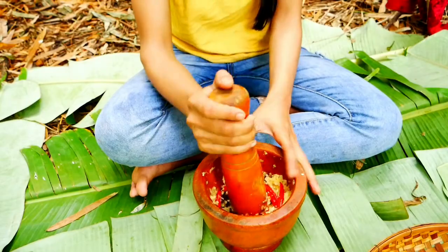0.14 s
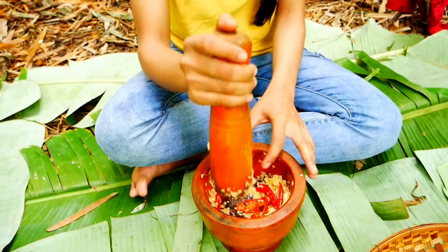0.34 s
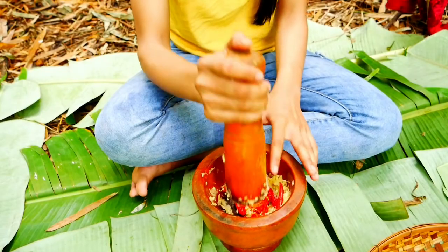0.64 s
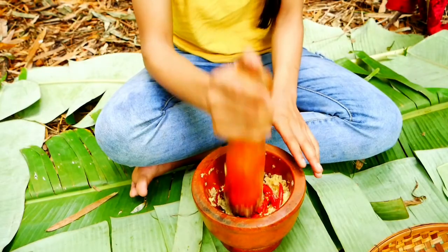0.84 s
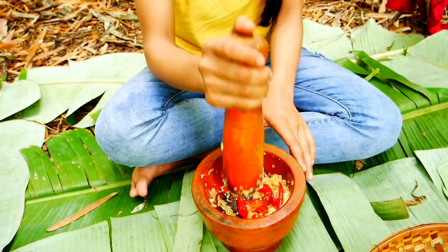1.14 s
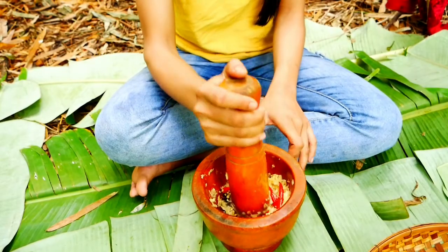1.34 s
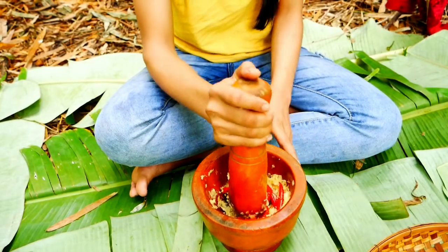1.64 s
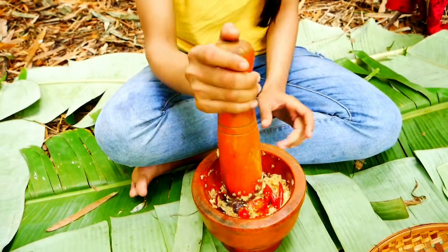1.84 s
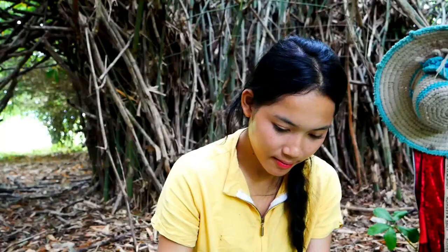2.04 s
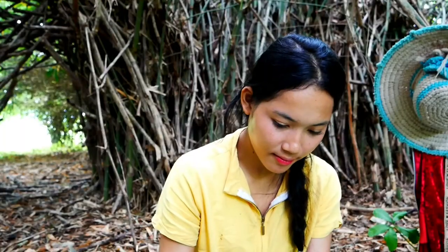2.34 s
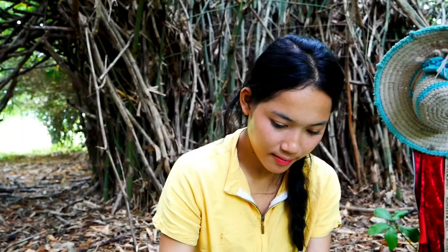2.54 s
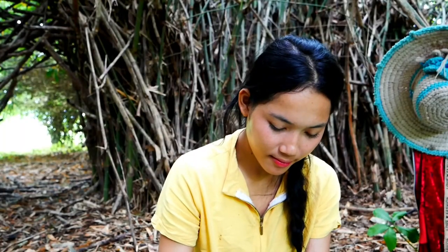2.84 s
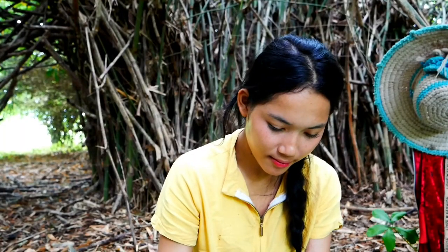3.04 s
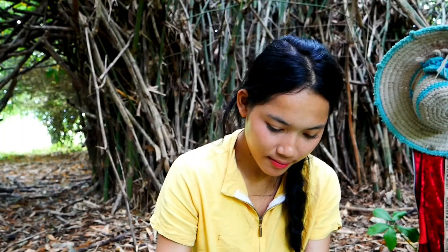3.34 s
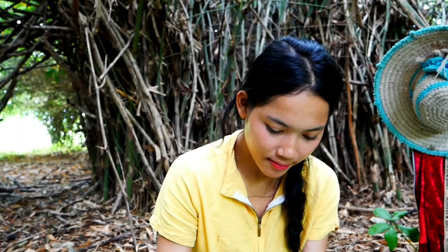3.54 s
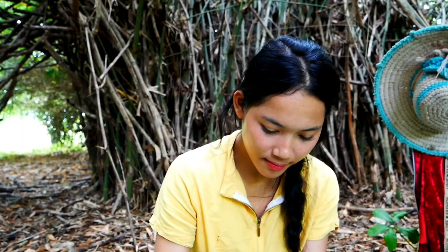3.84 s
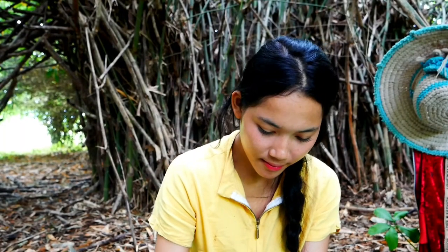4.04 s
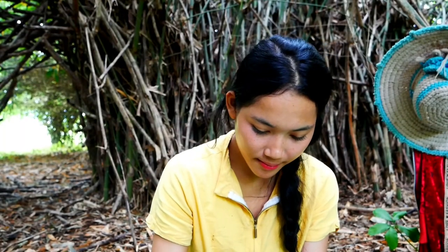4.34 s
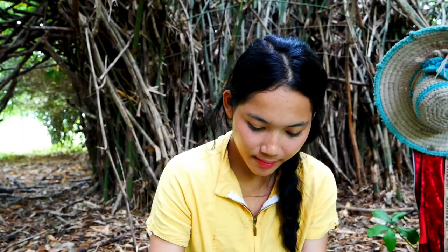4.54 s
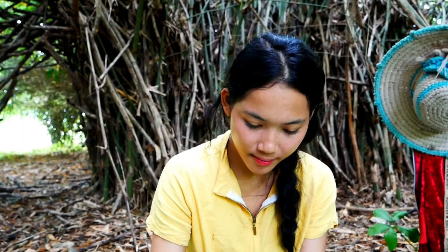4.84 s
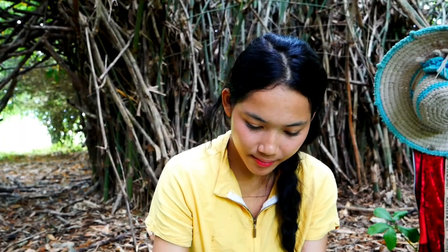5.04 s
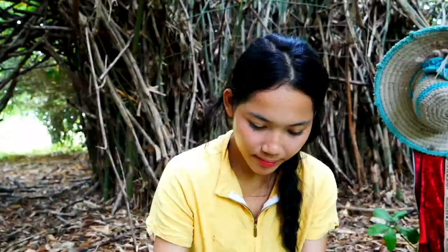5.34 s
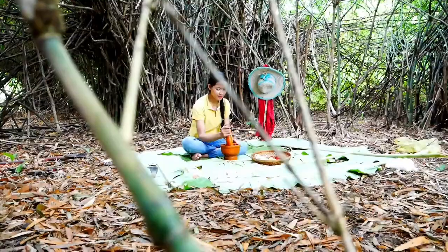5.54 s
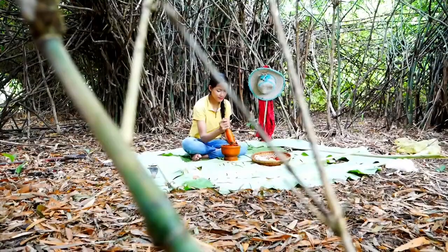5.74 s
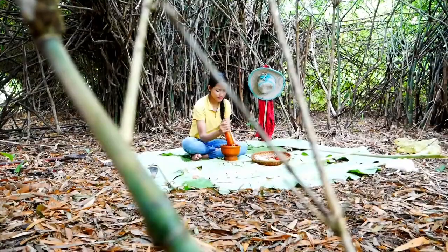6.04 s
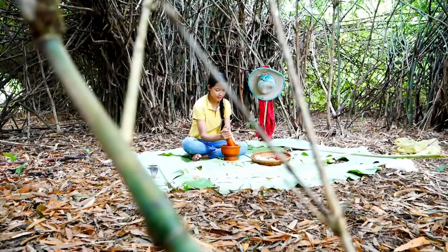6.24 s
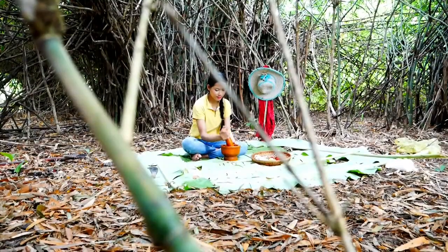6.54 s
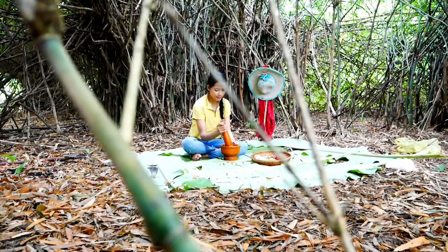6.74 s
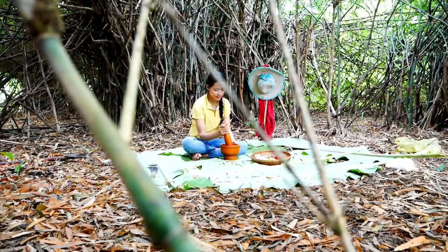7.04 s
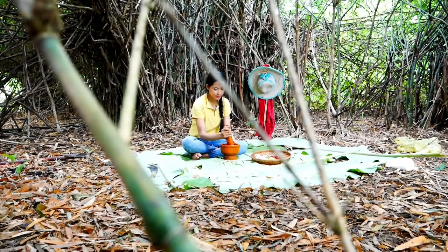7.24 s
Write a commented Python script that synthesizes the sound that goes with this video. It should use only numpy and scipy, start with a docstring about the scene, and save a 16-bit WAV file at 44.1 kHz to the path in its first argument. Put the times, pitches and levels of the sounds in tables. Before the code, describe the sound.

A light tap on clay and a few soft knocks lead into steady pounding as a wooden pestle crushes chilies in a clay mortar. The short, dull thuds come about three a second, each with a small crunch, some with a quick bounce or a brighter clack of clay. The blows weaken near the end. They sound close, over a faint outdoor hiss and low rumble.

```python
"""A light tap on clay and a few soft knocks, then steady pounding: a wooden pestle crushes chilies in a
clay mortar that stands on leaves outdoors. Each blow crunches through the pods and thuds on the floor of
the bowl; it often bounces, and now and then rings the clay wall. A faint hiss of the grove and a low
rumble lie underneath. The hardest blows drive the limiter."""
import sys
import numpy as np
from scipy.fft import rfft, irfft, next_fast_len
from scipy.io import wavfile
from scipy.ndimage import uniform_filter1d, minimum_filter1d, map_coordinates

SR = 44100
rng = np.random.default_rng(int(sys.argv[2]) if len(sys.argv) > 2 else 0)


def wrap_up_sound(samples):
    """Save the sound to the file named by the first command line argument, as 16-bit audio."""
    columns = np.atleast_2d(samples).T
    # keep every value between -1 and 1, then stretch to whole-number steps
    tamed = np.clip(columns, -1, 1)
    steps = np.round(tamed * 32767).astype(np.int16)
    wavfile.write(sys.argv[1], SR, steps)


N = 325889

# blows cushioned by the chili paste (time [s], level [dB], contact pitch [Hz])
PADDED_BLOWS = [(0.13, -8.5, 257), (0.1407, -19.5, 310), (0.28, -13.5, 1070), (0.478, -20, 400),
                (0.496, -24.5, 326), (0.507, -32, 484), (0.5194, -20, 305), (0.8842, 1, 437),
                (1.2335, 1, 420), (1.237, -10, 630), (1.5991, 5, 525), (1.632, -24, 700),
                (1.9629, 4.5, 512), (1.9665, -1.5, 610), (2.134, -9.5, 390), (2.138, -8.5, 550),
                (2.4376, 0.5, 440), (2.763, 3, 465), (2.769, 2.5, 620), (3.076, -7, 570), (3.0825, -3, 432),
                (3.3771, 3.5, 760), (3.3839, -3, 453), (3.6943, 0.5, 463), (4.0368, -2.5, 798),
                (4.038, -9, 310), (4.079, -26, 307), (4.4016, -5.5, 334), (4.4404, -20.5, 343),
                (4.7596, 5, 555), (4.761, -1, 1157), (4.7635, -5.5, 577), (4.7996, -17, 390),
                (5.13, -5.5, 405), (5.43, -1.5, 449), (5.8652, -8.5, 387), (5.866, -17.5, 990),
                (6.2226, -12, 902), (6.2226, -7.5, 388), (6.5852, -11, 617), (6.9091, -21, 257),
                (7.249, -20, 470), (7.2495, -28, 880), (7.259, -29, 330)]
# blows on bare clay, and at 5.13 s a bright clink of the pestle itself (time [s], level [dB], contact pitch
# [Hz], push t60 [ms], wall ring re blow [dB])
BARE_BLOWS = [(0.007, -17.5, 1270, 7.7, -21), (2.766, -1.5, 1143, 31, -20), (5.13, -12, 3500, 14, -26.5),
              (6.5806, 1.5, 1002, 22, -17.5)]
# the pestle bounces and lands again, heel then toe (time [s], level [dB])
BOUNCES = [(0.6008, -13), (0.9582, -10), (1.302, -6), (1.675, -7.5), (2.038, -5.5)]
# modes of the bowl's floor (pitch [Hz], level [dB], unchoked t60 [s])
BOWL_MODES = [(394.3, 1, 0.022), (551, -12.5, 0.027), (830, 1, 0.028), (1055, -3, 0.052), (1404, 0, 0.047),
              (1900, 0.5, 0.029)]
# resonances of the clay wall (centre [Hz], width [Hz], level [dB])
WALL_BANDS = [(750, 900, -4.5), (970, 190, 7.5), (1228, 310, 3), (1345, 590, -5), (1760, 1350, -4),
              (2390, 190, -9.5), (3330, 320, 2)]
# pods being crushed (peak time [s], level [dB], swell [ms], fade t60 [ms], pitch [Hz], treble [dB])
POD_CRUNCHES = [(0.1248, -30, 7.4, 79, 4220, -2.5), (0.4752, -34, 2.1, 6, 2940, -29),
                (0.4909, -30.5, 2.4, 31, 5100, -8), (0.8834, -10.5, 1.45, 12, 4810, -17),
                (1.2342, -15.5, 3.5, 11, 3830, -6), (1.5997, -5, 3.1, 2.7, 2900, -18),
                (1.9617, -13, 1.4, 13, 6150, -7), (2.0327, -32.5, 7.5, 20, 3060, -36),
                (2.135, -25.5, 8, 45, 2610, -24), (2.4409, -19, 5.4, 2.2, 4480, -10.5),
                (2.7647, -5, 2.44, 26, 1800, -38), (3.0788, -21, 5.2, 5.2, 3150, -11.5),
                (3.3789, -6.5, 1.25, 8.8, 1910, -16), (3.6977, -20.5, 8.4, 7, 3330, -36),
                (4.0355, -22, 6.5, 40, 1530, -35), (4.4021, -30, 13, 26, 2450, -32),
                (4.7592, -18.5, 3.2, 46, 3320, -27), (5.132, -18.5, 5.7, 9.1, 3510, -40),
                (5.4291, -20, 3.3, 4.2, 5030, -21), (5.868, -24, 2.9, 4.6, 3000, -7),
                (6.2233, -28, 1.6, 7.8, 1920, -21), (6.582, -13, 2.2, 29, 2880, -31),
                (7.2432, -47, 5.8, 29, 3000, -11)]
# faint ticks, some just after a blow (peak time [s], level [dB], pitch [Hz])
FAINT_TICKS = [(0.0094, -28, 1930), (0.28, -33, 1700), (0.5028, -36, 4930), (0.9037, -31, 3100),
               (1.253, -34, 3280), (1.619, -35, 3420), (3.586, -39.5, 2000), (4.4362, -36, 4820),
               (5.272, -36, 2040)]
# resonances of the wooden pestle (centre [Hz], width [Hz], level [dB])
PESTLE_BANDS = [(1920, 1670, 8), (2910, 1760, 6), (4900, 1050, -24)]
# level ride of the outdoor bed (time [s], rumble level [dB], hiss level [dB])
GROVE_LEVELS = [(0, -43.5, -47.5), (1.002, -45.5, -47), (1.9, -46.5, -44.5), (2.05, -45, -48.5),
                (2.16, -46, -51.5), (3.5, -46.5, -52.5), (5.3, -46, -51.5), (5.7, -44, -45),
                (6.401, -47.5, -45.5), (7.39, -44.5, -47)]
# tone curve of the low rumble (frequency [Hz], relative level [dB])
RUMBLE_SPECTRUM = [(18, -48), (40, -6), (110, 1), (300, -4.5), (600, -9.5), (1200, -15), (3000, -41)]
# tone curve of the grove's hiss (frequency [Hz], relative level [dB])
HISS_SPECTRUM = [(200, -9), (700, -6), (1500, -1.5), (4200, -1), (7000, -9.5), (10500, -15), (16500, -42)]

PADDED_T60_MS, PADDED_REF_HZ = 8.7, 490  # decay of the push at this pitch; higher contacts die sooner
SAG_SHARE, SAG_S = 1.1, .0008  # a padded push starts this share sharp and sinks as the paste spreads
HEEL_HZ, TOE_HZ, BOUNCE_T60_MS, TOE_DELAY_S, TOE_DB = 488, 373, 7.9, .00808, -16
PADDED_RING_DB, BOUNCE_RING_DB, GROUND_DB = -37, -47, -10  # wall ring and ground thump, re the blow
BOWL_MIX, BOWL_CHOKE_S = .45, .035  # the resting pestle stills the bowl's ring in this time
TICK_SWELL_MS, TICK_FADE_MS, TICK_TREBLE_DB = 1.7, 34, -14
CRUMBS_DB, CRUMBS_DB_PER_DB, MUTE_DB = -30.5, .26, -99  # louder crunches shed more crumbs
LOW_CUT_HZ, HIGH_CUT_HZ, TOP_HZ = 95, 12000, 16300
LIMITER_CEILING, LIMITER_SAMPLES = .995, 61


def contacts():
    """Pestle on clay (time [s], level [dB], pitch [Hz], t60 [ms], wall ring [dB], pitch sag [share])."""
    padded = [(s, db, hz, PADDED_T60_MS * (PADDED_REF_HZ / hz) ** .3, PADDED_RING_DB, SAG_SHARE)
              for s, db, hz in PADDED_BLOWS]
    bare = [(*blow, 0) for blow in BARE_BLOWS]
    heels = [(s, db, HEEL_HZ, BOUNCE_T60_MS, BOUNCE_RING_DB, 0) for s, db in BOUNCES]
    toes = [(s + TOE_DELAY_S, db + TOE_DB, TOE_HZ, BOUNCE_T60_MS, BOUNCE_RING_DB, 0) for s, db in BOUNCES]
    return padded + bare + heels + toes


def pestle_thuds():
    """A short push at the contact pitch drives the nearest bowl modes, the wall and the leafy ground."""
    out, t = np.zeros((2, N + SR)), np.arange(SR // 4) / SR
    for s, db, hz, t60_ms, wall_db, sag in contacts():
        cycles = hz * (t + sag * SAG_S * (1 - np.exp(-t / SAG_S)))
        push = np.sin(2 * np.pi * cycles) * amp(-60 * (1e3 * t / t60_ms) ** 1.7)
        drive_db = lambda mode_hz: -16 * np.log2(mode_hz / hz) ** 2  # distant modes barely speak
        bowl = sum(amp(mode_db + drive_db(mode_hz) + rng.normal(0, 1) - 60 * t / mode_t60)
                   * np.sin(2 * np.pi * mode_hz * t + rng.normal(0, .62))
                   for mode_hz, mode_db, mode_t60 in BOWL_MODES)
        choke = amp(-60 * (t / BOWL_CHOKE_S) ** 2)
        attack = 1 - np.exp(-(2 * hz * t) ** 2)  # the paste rounds the transient
        knock = attack * (push + BOWL_MIX * bowl * choke)
        knock /= np.abs(knock).max()
        clay = lambda f: sum(amp(band_db + .19 * drive_db(centre)) * resonance(f, centre, width) ** 2
                             for centre, width, band_db in WALL_BANDS)
        wall = stereo_noise(len(t), clay, correlation=.65)  # rough clay rattles rather than sings
        wall *= amp(wall_db - 60 * t / .24)
        thump = np.sin(2 * np.pi * 250 * t) * (1 - np.exp(-t / .001))  # the mortar's foot on the ground
        thump *= amp(GROUND_DB - 60 * (t / .024) ** 1.7)
        leaves = stereo_noise(len(t), lambda f: resonance(f, 300, 515) ** 2, correlation=.98)
        leaves *= amp(-16 - 60 * t / .07)
        scatter = stereo_noise(len(t), lambda f: resonance(f, hz, 1000) ** 2, correlation=-1)
        scatter *= amp(-21 - 60 * t / .03)
        mix_in(out, s, amp(db) * (knock + thump + attack * (wall + leaves + scatter)))
    return out[:, :N]


def crunches_and_ticks():
    """Pods break in a swelling burst of grains, coloured by the wood; faint ticks share that texture."""
    lead_s = .03  # room for the swell ahead of the peak
    out, t = np.zeros((2, N + SR)), np.arange(SR // 5) / SR - lead_s
    crunches = [(s, db, *tone, CRUMBS_DB + CRUMBS_DB_PER_DB * db) for s, db, *tone in POD_CRUNCHES]
    ticks = [(s, db, TICK_SWELL_MS, TICK_FADE_MS, hz, TICK_TREBLE_DB, MUTE_DB)
             for s, db, hz in FAINT_TICKS]
    wood = lambda f: sum(amp(db) * resonance(f, centre, width) ** 2 for centre, width, db in PESTLE_BANDS)
    for s, db, swell_ms, t60_ms, hz, treble_db, crumbs_db in crunches + ticks:
        colour = lambda f: (.5 * wood(f) + resonance(f, hz, 980) ** 2
                            + amp(treble_db) * resonance(f, 3800, 5500))
        swell = amp(-16 * np.abs(1e3 * t / swell_ms) ** 1.88)
        envelope = np.where(t < 0, swell, amp(-60e3 * t / t60_ms))
        noise = rng.standard_normal(len(t))
        grains_db = 3.5 * rng.exponential(size=len(t)) * (rng.random(len(t)) < .2)  # scattered spikes
        burst = envelope * filtered(noise * amp(grains_db), colour)
        burst *= np.linalg.norm(envelope) / np.linalg.norm(burst)
        side = .1 * envelope * stereo_noise(len(t), colour, correlation=-1)
        mix_in(out, s - lead_s, amp(db) * (burst + side) + amp(crumbs_db) * crumbs(t, hz, treble_db))
    return out[:, :N]


def crumbs(t, hz, treble_db):
    """Crumbs trickle back in clumps for a moment after the pod breaks at t = 0."""
    colour = lambda f: (1.56 * resonance(f, hz, 400) ** 2 + resonance(f, 4360, 3600) ** 2
                        + amp(treble_db / 2) * resonance(f, 9060, 5200) ** 2)
    rustle = stereo_noise(len(t), colour, correlation=.88)
    clumps_db = 1.53 * map_coordinates(rng.standard_normal(60), [np.linspace(0, 59, len(t))])
    fade_db = -60 * t / .22 - 9.2 * (t / .22) ** 2
    return rustle * (t > 0) * amp(clumps_db + fade_db)


def grove():
    """The outdoor bed: a wide low rumble and a centred hiss, each wavering a little."""
    times, rumble_db, hiss_db = np.transpose(GROVE_LEVELS)
    t = np.arange(N) / SR
    rumble_gain = amp(np.interp(t, times, rumble_db) + wobble(rate_hz=6))
    rumble = stereo_noise(N, tone_curve(RUMBLE_SPECTRUM), correlation=-.1)
    hiss_gain = amp(np.interp(t, times, hiss_db) + .4 * wobble(rate_hz=5))
    hiss = stereo_noise(N, tone_curve(HISS_SPECTRUM), correlation=.9)
    return rumble_gain * rumble + hiss_gain * hiss


def amp(db):
    """Decibels to linear gain."""
    return 10 ** (np.asarray(db) / 20)


def filtered(x, response):
    """Pass x through a complex frequency response."""
    size = next_fast_len(x.shape[-1] + 8192)
    return irfft(rfft(x, size) * response(np.fft.rfftfreq(size, 1 / SR)), size)[..., :x.shape[-1]]


def resonance(f, hz, width):
    """Band-pass response with unity gain at hz."""
    return 1j * f * width / (hz * hz - f * f + 1j * f * width)


def tone_curve(points):
    """An EQ curve drawn through (frequency [Hz], level [dB]) points."""
    hz, db = np.transpose(points)
    return lambda f: amp(np.interp(np.log(f + 1), np.log(hz), db))


def wobble(rate_hz):
    """Smooth random modulation."""
    knots = rng.standard_normal(int(N * rate_hz / SR) + 4)
    return map_coordinates(knots, [np.arange(N) * rate_hz / SR])


def stereo_noise(n, response, correlation):
    """Coloured noise of rms 1; correlation 1 is mono, 0 wide, -1 all side."""
    angle = np.arccos(correlation) / 2
    mid, side = filtered(rng.standard_normal((2, n)), response) * [[np.cos(angle)], [np.sin(angle)]]
    noise = np.array([mid + side, mid - side])
    return noise / np.sqrt(np.mean(noise ** 2) + 1e-20)


def mix_in(out, s, sound):
    """Drop a sound onto the track at s seconds."""
    start = round(s * SR)
    out[:, max(start, 0):start + sound.shape[1]] += sound[:, max(-start, 0):]


def scene():
    """Thuds and crunches up front, the grove behind."""
    return pestle_thuds() + crunches_and_ticks() + grove()


def record(dry):
    """The microphone sheds deep bass and high treble; a fast limiter holds the loud blows."""
    low_cut = lambda f: (1j * f / (LOW_CUT_HZ + 1j * f)) ** 3
    high_cut = lambda f: 1 / (1 + (f / HIGH_CUT_HZ) ** 36) ** .5 + amp(-32)
    heard = filtered(dry, lambda f: low_cut(f) * high_cut(f))
    safe_gain = np.minimum(1, LIMITER_CEILING / (np.abs(heard).max(axis=0) + 1e-9))
    gain = uniform_filter1d(minimum_filter1d(safe_gain, LIMITER_SAMPLES), LIMITER_SAMPLES)
    return filtered(heard * gain, lambda f: f < TOP_HZ)  # brick-wall band limit


dry = scene()
out = record(dry)
wrap_up_sound(out)
```